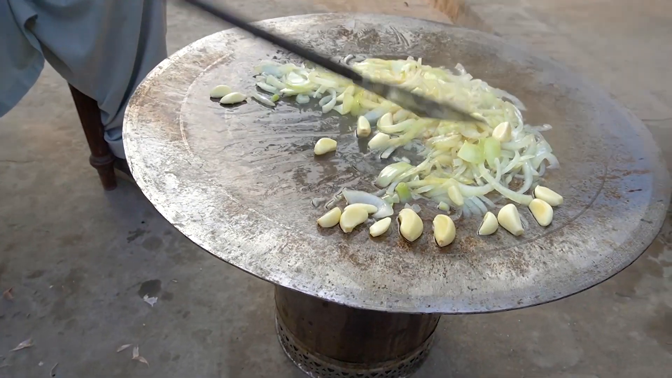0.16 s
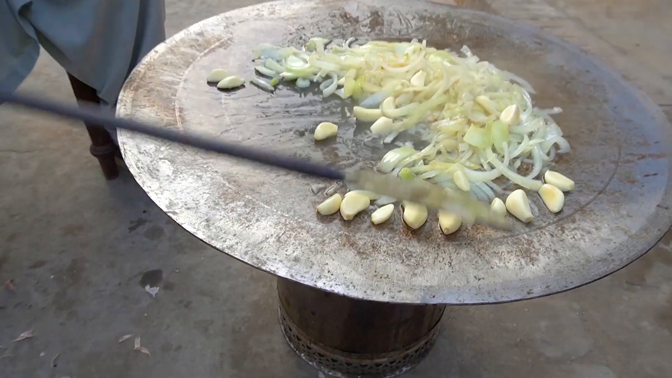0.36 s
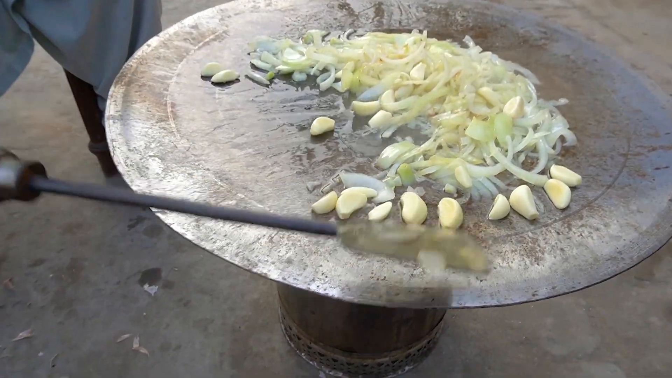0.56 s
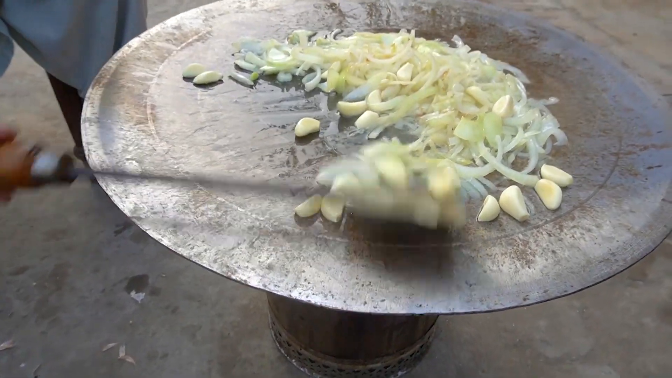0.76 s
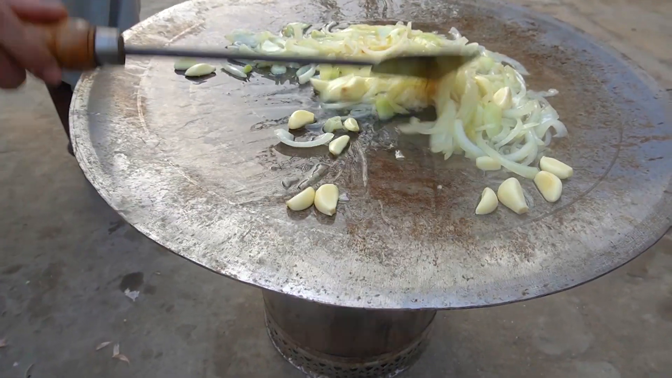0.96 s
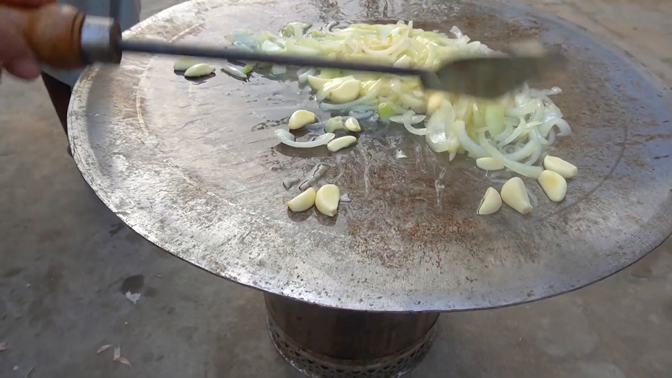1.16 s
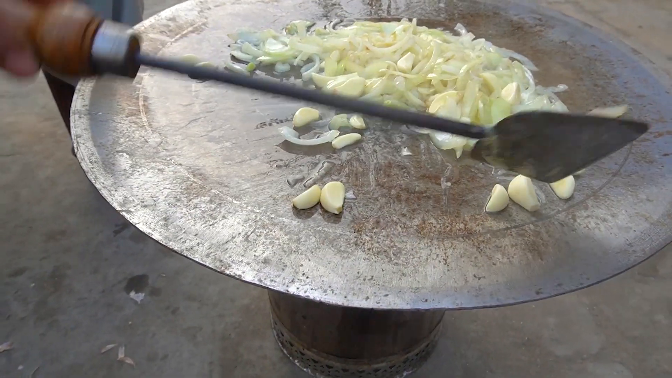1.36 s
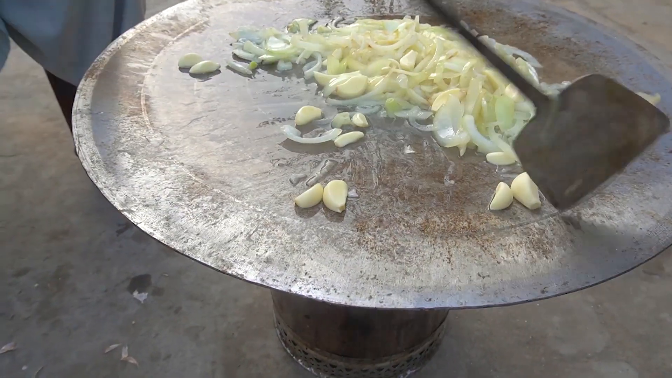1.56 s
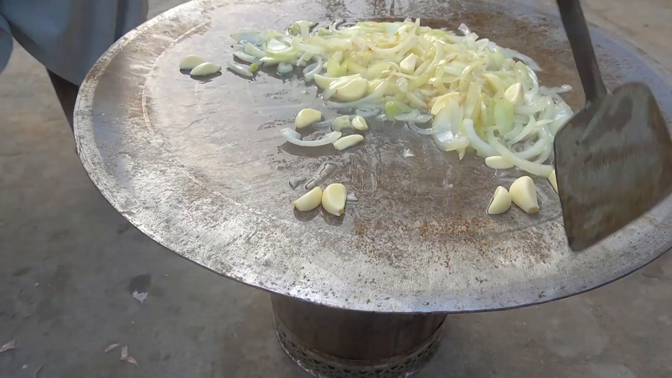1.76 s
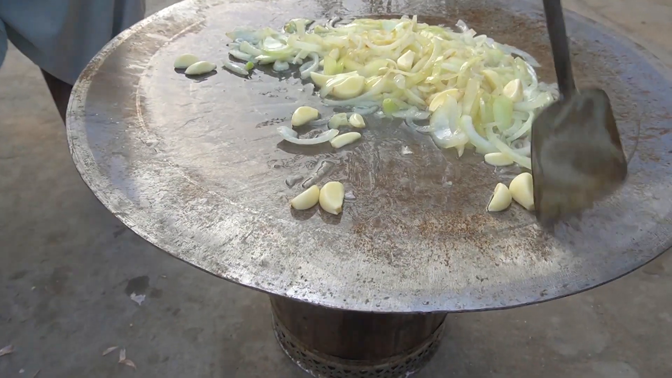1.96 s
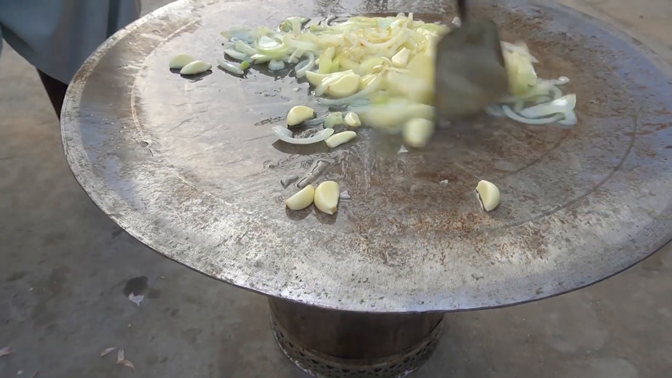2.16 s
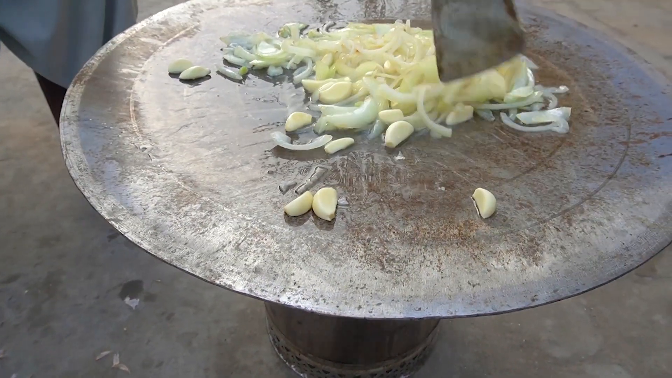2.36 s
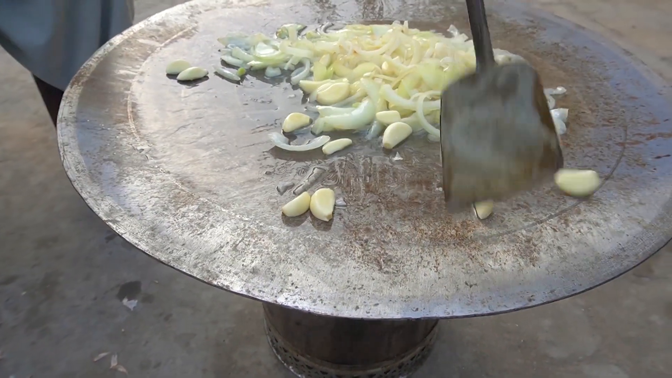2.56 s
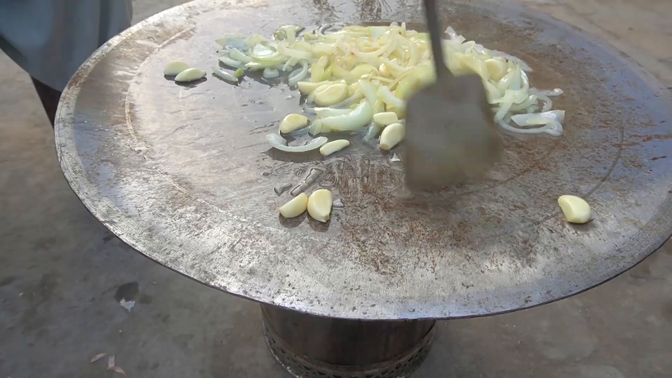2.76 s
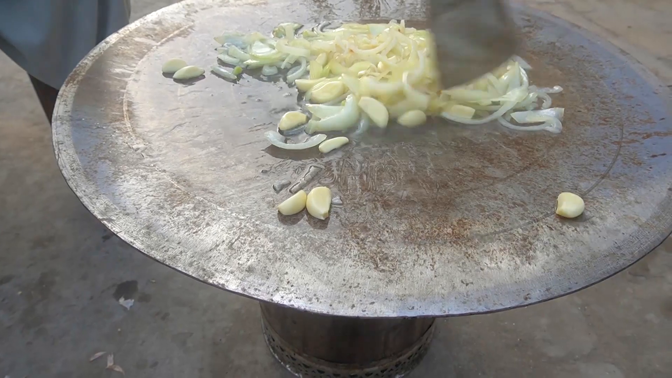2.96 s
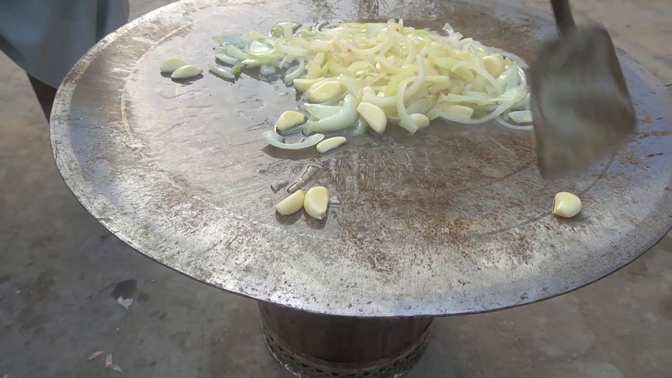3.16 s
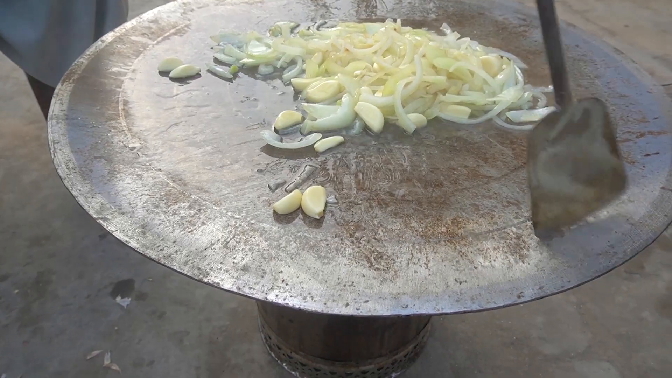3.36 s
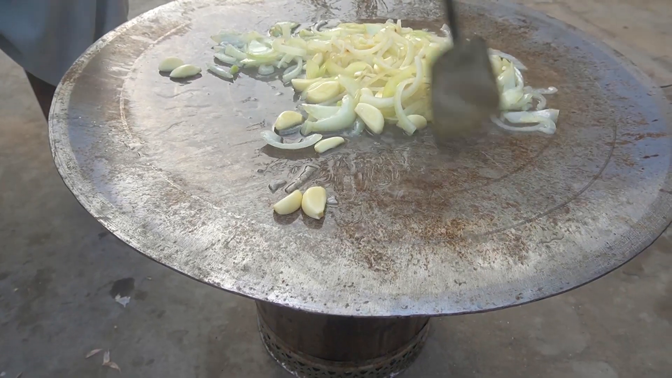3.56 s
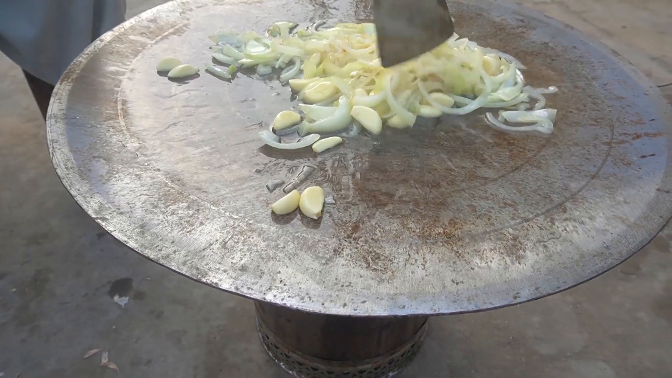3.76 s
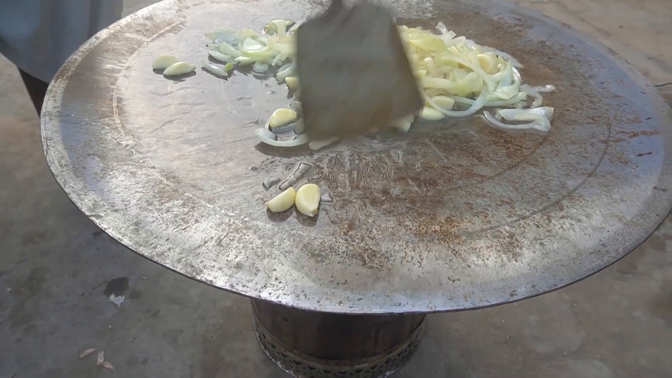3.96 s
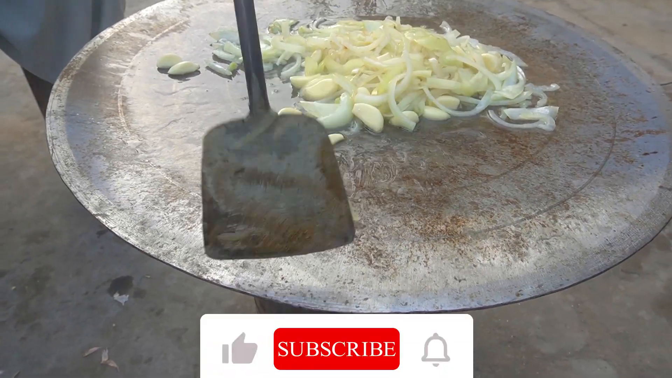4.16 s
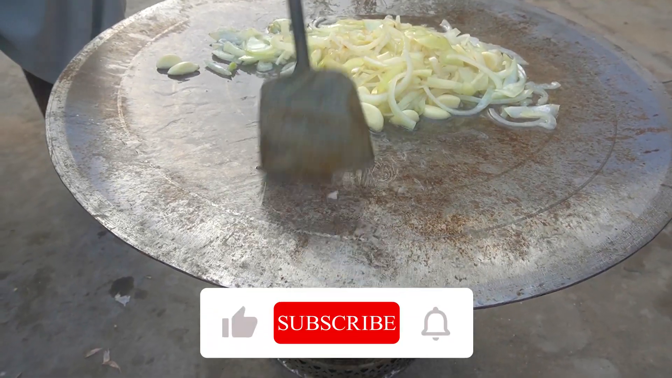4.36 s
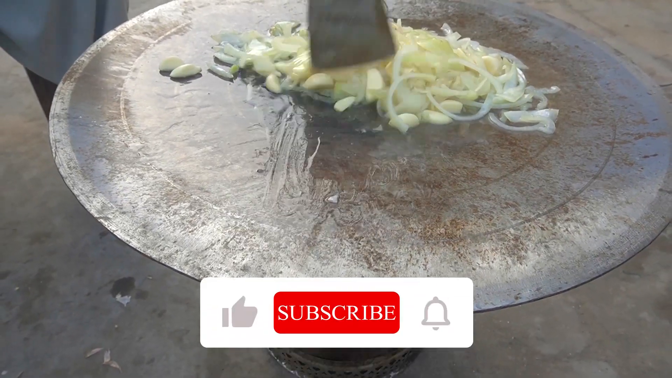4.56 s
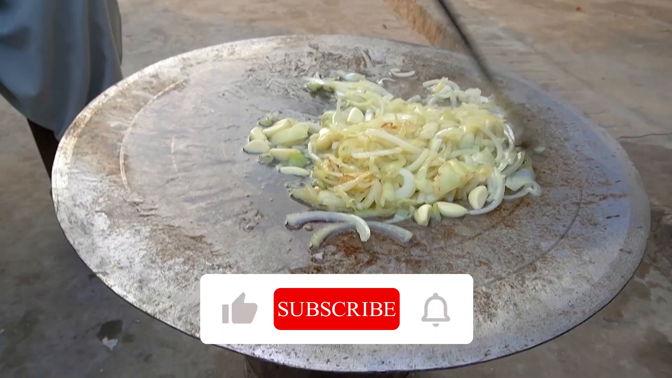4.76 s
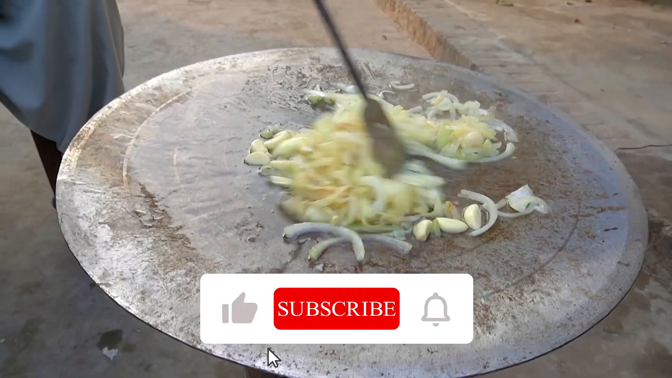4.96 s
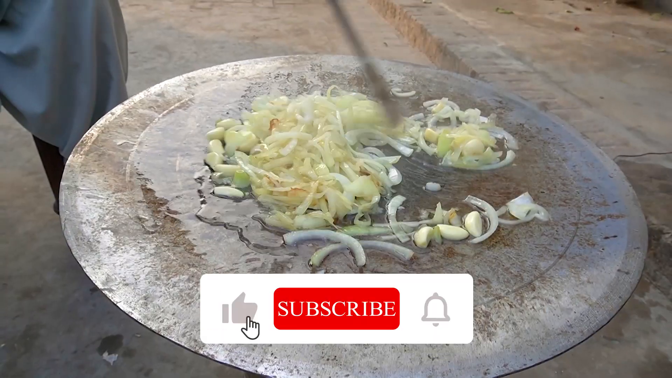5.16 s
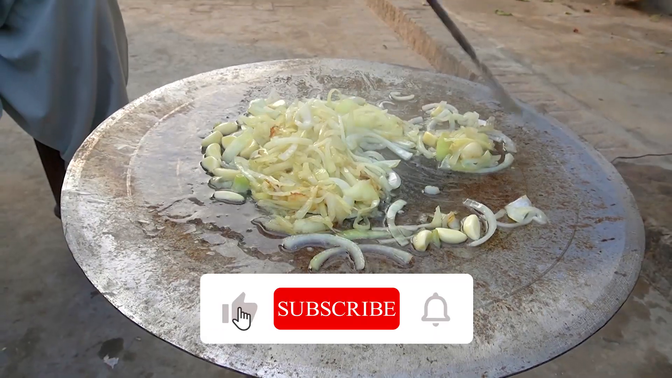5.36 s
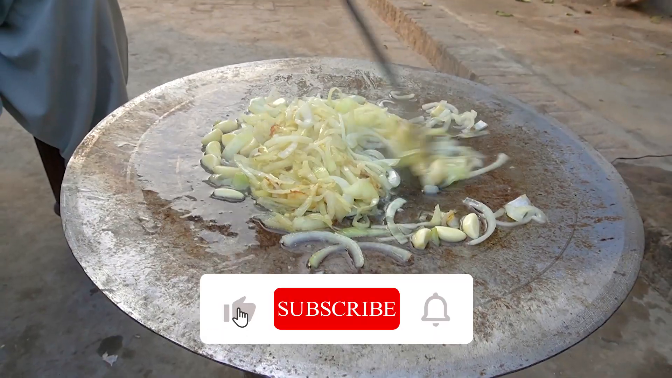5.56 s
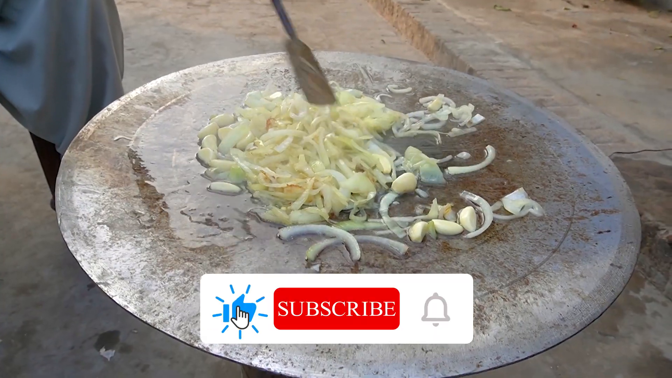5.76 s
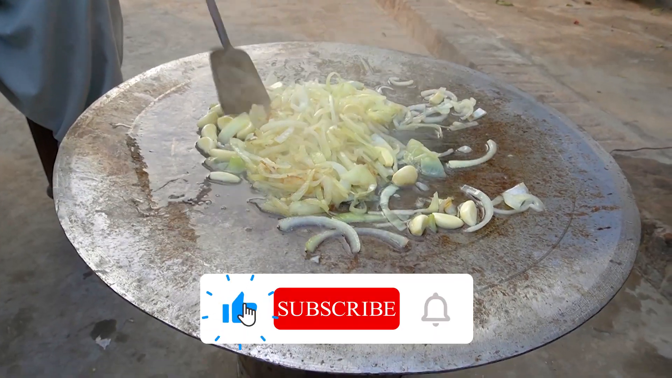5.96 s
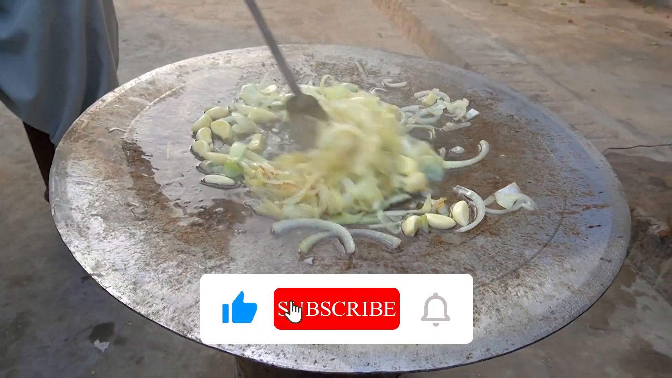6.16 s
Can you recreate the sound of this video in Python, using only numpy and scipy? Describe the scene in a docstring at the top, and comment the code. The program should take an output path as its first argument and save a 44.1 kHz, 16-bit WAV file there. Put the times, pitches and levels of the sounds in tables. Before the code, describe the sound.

Close, gritty steel-on-steel scrapes with bright clanks and short rings, over steady frying hiss and crackle that grows louder near the end.

```python
"""A steel spatula works a wide griddle outdoors, close to a pair of microphones: noisy slips excite blade and plate.
It lands with a clink, grates and lifts, again and again; decaying modes make the blade ring briefly and
the griddle hum on after the blows. Friction squeals and soft onion squelches are swells of resonant noise.
Oil spits in between in short bursts; frying onions hiss and crackle from filtered noise and many small bursts.
Farthest off are the dull rush of fire and open air, and short echoes of the near sounds from the yard."""
import sys
import numpy as np
from scipy import signal
from scipy.fft import rfft, irfft
from scipy.io import wavfile
from scipy.ndimage import uniform_filter1d

SR = 44100
rng = np.random.default_rng(int(sys.argv[2]) if len(sys.argv) > 2 else 0)


def wav_record(signal):
    """Record a signal, one row per channel, as 16-bit PCM in the file named by sys.argv[1]."""
    frames = np.transpose(np.atleast_2d(signal))
    bounded = np.clip(frames, -1, 1)
    # unit amplitude maps onto the largest positive 16-bit level
    quanta = np.round(bounded * 32767).astype(np.int16)
    wavfile.write(sys.argv[1], SR, quanta)


N = 273420
TIME, HZ = np.arange(N) / SR, np.fft.rfftfreq(N, 1 / SR)

# pushes of the spatula, blade flat or on its side edge: (time [s], length [s], rise [s], grating level [dB],
# then relative to the grating: plate rumble [dB], blade rasp [dB], fine grit [dB], first bite [dB],
# ring on lifting [dB]; left over right [dB])
FLAT_PUSHES = [ (.752, 0.16, 0.045, -17.5, -19.5, -13, -1, -35, -34, 1.2),
               (2.05, 0.1, 0.032, -19, -8.5, -7, -1, -10, -22, .7),
               (2.800, 0.014, 0.0025, -15.5, -23.5, -6.5, 0.5, -8, -15.5, 1.3),
               (3.447, 0.17, 0.038, -18, -7.5, -6.5, -3.5, -6, -25.5, .6),
               (4.352, 0.13, 0.01, -20, -22, -7.5, -0.5, -4, -8.5, 3.3), ]
EDGE_PUSHES = [ (4.814, 0.12, 0.056, -17.5, -12.5, -7.5, -4.5, -16, -22, 0.8),
               (5.499, 0.0094, .002, -30, 4.5, -3, 3, -30, -30, 1),
               (5.563, 0.093, 0.029, -16.5, -7, -9, -3, -23, -43, 1.9),
               (6.098, 0.081, 0.0084, -19, -3.5, -2.5, -3, -23, -25, 3.9), ]
# resonances of spatula and plate in contact, blade flat or on its side edge:
# (frequency [Hz], half-width [Hz], relative level [dB])
FLAT_BLADE_MODES = [(1830, 18, -15), (2650, 69, 0.5), (3297, 89, -10), (5050, 190, -3), (5730, 89, -4),
                    (5760, 14, -3), (6510, 17, 8.5), (7000, 35, -24), (7650, 47, -5.5), (7250, 100, 3),
                    (8700, 59, -6.5), (8160, 38, -8), (8450, 17, -16), (8800, 7, 1), (9010, 51, 0),
                    (9800, 47, -16), (9340, 170, -6.5), (10170, 105, -3.5), (10850, 53, -5.5),
                    (11220, 110, -11.5), (12000, 130, -7), (12800, 26, -25), (14300, 66, -22),
                    (15000, 120, -37.5)]
EDGE_BLADE_MODES = [(1673, 60, -1), (2234, 220, 2), (3350, 65, -4), (4140, 330, 5), (4890, 310, 0),
                    (5820, 160, 0), (6940, 120, 0), (7500, 190, -6), (8400, 170, -22), (9000, 230, -3),
                    (9600, 130, -4.5), (10520, 89, -4.5), (11500, 320, -11), (12700, 200, -16),
                    (14100, 140, -19)]
# the plate's resonances under the blade: (frequency [Hz], half-width [Hz], relative level [dB])
PRESSED_PLATE_MODES = [(183, 12, -29), (350, 25, -6), (420, 27, -0.5), (688, 42, 1), (849, 43, 6.5),
                       (1065, 130, 0.5)]
# overall colour of steel grating on steel: (frequency [Hz], relative level per Hz [dB])
GRATING_COLOUR = [(59, -71), (100, -59), (283, -44), (365, -50), (547, -29), (854, 1), (1100, -0.5),
                  (1420, -15.5), (1680, 4.5), (2990, 2.5), (3320, 1.5), (6700, 5.5), (10700, -6.5),
                  (14400, -8.5), (16000, -27)]
# the blade's antiresonance: (frequency [Hz], width [Hz], depth [dB])
ANTIRESONANCE = (1397, 57, 19)
# the spatula strikes the griddle: (time [s], clatter level [dB], relative to the clatter: crack [dB], treble [dB];
# plate thud level [dB], blade ring level [dB], t60 of the clatter [s])
STRIKES = [(0.6845, -35, -3, 17, -36, -36, 0.33), (1.5659, -21, 0, -2, -42, -29.5, 0.2),
           (1.9823, -22, 8, -18, -29, -42, 0.54), (2.4905, -45.5, 3, -28, -42, -70, .05),
           (2.7324, -24.5, 8.5, 2, -28.5, -35.5, 0.27), (2.8594, -20.5, 2, 5, -60, -31, 0.1),
           (3.3903, -23.5, 3.5, 4.5, -29.5, -33, .22), (4.2899, -20.5, 2.5, -1.5, -31.5, -28, 0.19),
           (5.5007, -31, -8, 6.5, -28, -32, 0.12)]
# colour of crack and clatter: (frequency [Hz], relative level per Hz [dB])
CLINK_COLOUR = [(88, -36), (150, -52), (341, -14), (555, -4), (649, -15.5), (1040, 6.5), (1390, -47),
                (1690, -8), (2020, -2), (2700, 0.5), (2920, -8), (4160, 3), (7320, 3), (9080, 4),
                (16000, -19.5)]
# ringing modes of the blade: (frequency [Hz], relative level [dB], t60 before scaling by contact [s])
BLADE_RING_MODES = [(1690, -10, .18), (2330, -11, .18), (3295, -13, .36), (3628, -14, .4), (3980, -16, .3),
                    (4380, -11, .3), (4727, -14, .29), (5130, -7, .3), (5440, -6, .36), (5526, -2, .25),
                    (5820, -7, .27), (5950, -9, .24), (6490, -8, .16), (7400, -10, .16), (8236, -5, .14),
                    (9020, -2, .11), (9320, 1, .091), (9740, 0, .066), (10730, -1, .11), (11240, -12, .15)]
# the griddle's thud under the blade: (frequency [Hz], relative level [dB], t60 [s])
THUD_MODES = [(284, -7, 0.058), (342.2, -6, 0.47), (377.5, 10.5, 0.22), (420.4, -2, 0.28), (723, -2, 0.21),
              (843, 3.5, 0.12), (1082, -4.5, 0.16)]
# friction makes one resonance of blade or plate sing out, sinking in pitch as the contact moves:
# (time [s], length [s], first frequency [Hz], width [Hz], level [dB])
FRICTION_SQUEALS = [(.69, 0.1, 5750, 250, -35.5), (0.77, 0.036, 7100, 120, -23.5),
                    (.828, 0.069, 3400, 396, -23.5), (0.879, 0.061, 1852, 300, -35),
                    (2.085, 0.052, 1770, 160, -24.5), (2.81, 0.026, 6560, 70, -21.5),
                    (2.815, 0.075, 1900, 90, -33), (2.855, 0.028, 6600, 70, -19),
                    (3.485, .1, 950, 250, -36.5), (3.486, .11, 7510, 170, -24),
                    (3.595, .04, 6430, 70, -19.5), (4.383, .13, 1956, 130, -32.5),
                    (4.806, 0.1, 1726, 70, -33.5), (5.608, .063, 4850, 200, -21.5)]
# the whole plate shudders as the blade digs in: (time [s], length [s], level [dB])
PLATE_SHUDDERS = [(.715, 0.047, -58), (2.02, 0.074, -52.5), (2.765, 0.033, -47), (3.42, 0.079, -40.5),
                  (4.30, 0.091, -66), (4.83, 0.15, -52)]
# soft knocks and squelches in the onions: (time [s], length [s], centre [Hz], width [Hz], level [dB])
ONION_SQUELCHES = [(0.307, 0.0062, 2550, 2500, -34), (2.484, 0.029, 915, 600, -38.5),
                   (2.493, 0.047, 398, 147, -43), (3.221, 0.052, 2330, 1111, -43),
                   (5.032, 0.061, 7640, 1800, -39)]
# the griddle is let go and one mode hums on until it is touched again:
# (time [s], length [s], frequency [Hz], level [dB], t60 [s])
GRIDDLE_HUMS = [(1.6, .39, 354, -42.5, 3.6), (2.5, .25, 354, -43, .6), (2.754, .53, 354, -37.5, 1.17),
                (4.42, .4, 734, -49, 2.7), (4.836, 1.3, 263.7, -53, 7), (4.85, .4, 467, -49, 1.2),
                (5.518, .6, 354.5, -30.5, 2.4)]
# the loudest spits of oil: (time [s], level before a common lift [dB], centre [Hz])
LOUD_SPITS = [(0.3063, -19, 7500), (.4098, -14, 12600), (0.553, -21.5, 12500), (.666, -20, 10400),
              (2.5321, -25, 8450), (3.2303, -28.5, 2970), (3.8089, -25, 7240), (5.1639, -20, 8550),
              (5.903, -29, 4050)]
# the sizzle's level wavers, sinks somewhat, then is clearly louder from about 5 s on:
# (time [s], reference level of the frying [dB])
FRYING_LEVEL = [(0, -45.5), (.66, -46), (1, -51.5), (1.9, -47.5), (2.3, -52.5), (3.1, -50), (4.1, -54),
                (4.8, -53), (5.05, -42), (6.2, -44)]
# colour of the steam's hiss: (frequency [Hz], relative level per Hz [dB])
HISS_COLOUR = [(1180, -20), (2000, -17), (2200, -12), (2710, -46), (5580, 3), (8120, 4.5), (11200, 1),
               (12500, 1), (16000, 2)]
# colour of fire and open air: (frequency [Hz], relative level per Hz [dB])
AIR_COLOUR = [(59, -88), (100, -40.5), (252, -10), (315, -19.5), (349, -9.5), (436, -5.5), (545, -4.5),
              (615, -5.5), (808, -2.5), (1260, -4.5), (1500, -3), (1750, -6), (2150, -4.5), (6000, -15),
              (7800, -22), (13200, -120)]
# steady narrow tones in the air: (frequency [Hz], width [Hz], level before a common trim [dB])
AIR_DRONES = [(568, 23, -62.5), (872, 23, -59.5), (1570, 19, -62.5), (2190, 110, -57)]
# likeness of the two microphones: (frequency [Hz], left-right correlation)
MICROPHONE_LIKENESS = [(50, 1), (150, 0.96), (700, 0.93), (1500, 0.79), (3100, 0.72), (7000, 0.53),
                       (15000, 0.43)]

# a push builds from a light touch, holds, and dies as the blade lifts
TOUCH_DB, RELEASE_DB_PER_S = -15, 568
# share of the build-up that the lower bands follow: pressing harder is brighter
RASP_FOLLOWS, RUMBLE_FOLLOWS = 0.57, 0.57
RUMBLE_FADE_DB_PER_S = 94  # the plate's rumble fades as the blade slides in under the onions
BOOM_DB, BOOM_FADE_DB_PER_S = -11, 138  # its lowest modes, relative to the rumble, fade sooner
BITE_CRACK_DB, BITE_TREBLE_DB, BITE_T60, BITE_RING_DB = 3, -28, 0.058, -22  # clink as the edge digs in; t60 in s
LIFT_T60 = 0.27  # s, the blade rings free after a push
REFERENCE_T60 = .2  # s, ring time at which the blade's modes keep their listed t60
SQUEAL_SAG_PER_S = 0.193  # share of the pitch lost each second
SHUDDER_HZ, SHUDDER_WIDTH_HZ = 194.3, 31
HUM_BLOOM_S, HUM_DAMP_S = 0.021, .04  # the hum swells once the blade is off the plate, and dies at the next touch
SMALL_SPITS_PER_S, SMALL_SPIT_HZ = 13, (3000, 10800)
SMALL_SPIT_DB, SMALL_SPIT_SPREAD_DB = 14, 2.2  # over the frying level, before the common lift; and its scatter
AIR_DB, AIR_FOLLOWS = -47.5, 0.53  # air at the mean frying level; share of the frying's swings that it follows
BAND_LIMIT_HZ = 15900


def scrapes(pushes, blade, grain_db, broad_db, plate_db, judder_db, shifting_db):
    """Countless tiny slips excite blade and plate; the pressure builds, judders along the push and lets go."""
    grain = unit(uniform_filter1d(rng.standard_normal(N), 24))
    slips = noise() * amp(grain_db * grain)
    body = np.hypot(peaks(blade), amp(plate_db) * peaks(PRESSED_PLATE_MODES))
    grating = amp(broad_db + read(GRATING_COLOUR, HZ))
    steel = rfft(patchy(colour(slips, hollow() * np.hypot(body, grating)), shifting_db))
    wobble = uniform_filter1d(uniform_filter1d(rng.standard_normal(N), 400), 200)
    judder = amp(judder_db * unit(wobble))

    # boom, rumble, rasp, grating, grit
    edges_hz = [0, 550, 1400, 3200, 7800, SR]
    bands = [judder * irfft(steel * ((HZ >= low) & (HZ < high)), N) for low, high in zip(edges_hz, edges_hz[1:])]

    out = np.zeros((2, N))
    for s, length, rise, level, rumble, rasp, grit, _, _, pan in pushes:
        on = (TIME >= s) & (TIME <= s + length + 40 / RELEASE_DB_PER_S)  # lasts until 40 dB down
        t = TIME[on] - s
        db = level - RELEASE_DB_PER_S * np.maximum(t - length, 0)
        touch = TOUCH_DB * np.maximum(1 - t / rise, 0)
        gains = [
            amp(db + rumble + BOOM_DB - BOOM_FADE_DB_PER_S * t),
            amp(db + rumble + RUMBLE_FOLLOWS * touch - RUMBLE_FADE_DB_PER_S * t),
            amp(db + rasp + RASP_FOLLOWS * touch),
            amp(db + touch) * panned(pan),
            amp(db + grit + touch) * panned(pan),
        ]
        push = sum(gain * unit(band[:, on]) for gain, band in zip(gains, bands))
        out[:, on] += push * signal.windows.tukey(len(t), .02)
    return out


def blows(crack_s=0.0043, thud_rise_s=0.034, sag=0.185, press_s=0.0218):
    """A crack, dense clatter, longer blade modes and the plate's slower thud; each push also bites and rings off."""
    out, t = np.zeros((2, N)), np.arange(SR // 2) / SR
    steel = unit(colour(patchy(noise(), 7.5), hollow() * amp(read(CLINK_COLOUR, HZ))))
    treble = signal.sosfiltfilt(signal.butter(2, 8000, "high", fs=SR, output="sos"), steel)
    stiffening = t - sag * press_s * (1 - np.exp(-t / press_s))  # the thud rises in pitch as the blade bears down

    def clink(s, crack_db, treble_db, t60):
        """A brief crack over a clatter that dies exponentially, both of steel-coloured noise."""
        at = (round(s * SR) + np.arange(len(t))) % N
        fall = amp(crack_db) * np.exp(-(t / crack_s) ** 2) + amp(-60 * t / t60)
        return (steel[:, at] + (amp(treble_db) - 1) * treble[:, at]) * fall

    def blade_ring(t60):
        """The blade's modes ring and die, their decay scaled by the contact."""
        return ring([(hz, level, free * t60 / REFERENCE_T60) for hz, level, free in BLADE_RING_MODES], t)

    for s, db, crack_db, treble_db, thud_db, ring_db, t60 in STRIKES:
        thud = ring(THUD_MODES, stiffening) * (1 - np.exp(-t / thud_rise_s))
        clatter = amp(db) * clink(s, crack_db, treble_db, t60)
        add(out, s, clatter + amp(ring_db) * blade_ring(t60) + amp(thud_db) * thud)

    for s, length, _, db, *_, bite_db, lift_db, _ in FLAT_PUSHES + EDGE_PUSHES:
        bite = clink(s, BITE_CRACK_DB, BITE_TREBLE_DB, BITE_T60) + amp(BITE_RING_DB) * blade_ring(BITE_T60)
        add(out, s, amp(db + bite_db) * bite)
        add(out, s + length, amp(db + lift_db) * blade_ring(LIFT_T60))
    return out


def squeals_and_squelches():
    """Modes caught by friction, shudders of the plate and wet onion being shoved: swells of resonant noise."""
    out = np.zeros((2, N))
    for s, length, hz, width, db in FRICTION_SQUEALS:
        last_hz = hz * (1 - SQUEAL_SAG_PER_S * length)
        add(out, s, amp(db) * swell(length, (hz, last_hz), width))
    for s, length, db in PLATE_SHUDDERS:
        add(out, s, amp(db) * swell(length, SHUDDER_HZ, SHUDDER_WIDTH_HZ))
    for s, length, hz, width, db in ONION_SQUELCHES:
        add(out, s, amp(db) * swell(length, hz, width))
    return out


def griddle_hum():
    """Low plate modes bloom and decay on their own, until a touch damps them."""
    out = np.zeros((2, N))
    for s, length, hz, db, t60 in GRIDDLE_HUMS:
        t = np.arange(int(length * SR)) / SR
        bloom = 1 - np.exp(-t / HUM_BLOOM_S)
        damping = np.minimum((length - t) / HUM_DAMP_S, 1)
        add(out, s, ring([(hz, db, t60)], t) * bloom * damping)
    return out


def spits(cycles=0.92, level_db=2, snap=0.5, snap_s=0.00096):
    """Larger drops of water burst in the oil: a short pulse and a snap of spray. Small ones come at random."""
    out, t = np.zeros((2, N)), np.arange(400) / SR
    times = TIME[rng.random(N) < SMALL_SPITS_PER_S / SR]
    low, high = SMALL_SPIT_HZ
    small = []
    for s in times:
        db = frying_db(s) + rng.normal(SMALL_SPIT_DB, SMALL_SPIT_SPREAD_DB)
        small.append((s, db, low * (high / low) ** rng.random()))
    for s, db, hz in LOUD_SPITS + small:
        spray = np.gradient(rng.standard_normal((2, len(t))) * np.exp(-t / snap_s) * (t > t[1]), axis=1)
        pop = burst(t, hz, cycles) + snap * spray
        add(out, s + 0.001013, amp(db + level_db) * pop * panned(rng.normal(1, 3.1)))
    return out


def frying(hiss_db=-2, crackle_db=-3, bursts_per_s=1300, spread_db=4, air_db=0, tones_db=-1, count=12):
    """Steam hisses and tiny bubbles burst in the oil, over the dull rush of fire and open air."""
    heat_db = frying_db(TIME)
    heat, air = amp(heat_db), amp(AIR_DB + AIR_FOLLOWS * (heat_db - heat_db.mean()))

    # each pitch of bubble has its own random instants, sizes and place between the microphones
    crackle, t = np.zeros((2, N)), np.arange(200) / SR
    for hz in np.geomspace(2400, 15000, count):
        size = amp(spread_db * np.minimum(rng.exponential(1, N), 4.5))
        bubbles = size * (rng.random(N) < bursts_per_s / count / SR)
        pulse = burst(t, hz, 0.5) * (hz / 5000) ** 0.52
        crackle += np.convolve(bubbles, pulse)[:N] * panned(rng.normal(1, 4.2))

    hiss = unit(colour(noise(), amp(read(HISS_COLOUR, HZ))))
    sizzle = heat * (amp(hiss_db) * hiss + amp(crackle_db) * unit(crackle))
    rush = amp(air_db) * unit(colour(noise(), amp(read(AIR_COLOUR, HZ))))
    # the untapered middle of each long swell is steady
    tones = sum(amp(db) * swell(N / SR * 2, hz, width)[:, N // 2:][:, :N] for hz, width, db in AIR_DRONES)
    return sizzle + air * rush + unit(air) * amp(tones_db) * tones


def yard(x, bass_t60=0.26, treble_t60=0.061):
    """Short scattered echoes from the ground and nearby walls; the treble dies sooner."""
    taps = noise()[:, :SR // 2] * (TIME[:SR // 2] > .004)
    hz, t, z = signal.stft(taps, SR, nperseg=256)
    t60 = read([(500, bass_t60), (10000, treble_t60)], hz)[:, None]
    tail = signal.istft(z * amp(-60 * t / t60), SR, nperseg=256)[1]
    return signal.fftconvolve(tail / np.linalg.norm(tail[0]), x, axes=1)[:, :N]


def frying_db(s):
    """Reference level of the frying at time s, in dB."""
    return np.interp(s, *np.transpose(FRYING_LEVEL))


def burst(t, hz, cycles):
    """A bursting bubble: a short oscillation that swells and dies, with no net push."""
    age = t * hz / cycles
    wave = np.gradient(age * np.exp(-age) * np.sin(2 * np.pi * hz * t))
    return wave / abs(wave).max()


def ring(modes, t):
    """Dying modes; high ones reach the two microphones out of step."""
    hz, db, t60 = np.transpose(modes)[:, :, None]
    lag = rng.standard_normal((2, len(modes), 1)) * hz / 12000
    return (amp(db - 60 * t / t60) * np.sin(2 * np.pi * hz * t + lag)).sum(1)


def swell(length, hz, width):
    """A swell of noise in one resonance; hz is one pitch or a glide (first, last)."""
    count = int(length * SR)
    pitch = np.linspace(*np.broadcast_to(hz, 2), count)
    r = np.exp(-np.pi * width / SR)
    complex_noise = rng.standard_normal((count + 4000, 2)) @ [1, 1j]
    wander = signal.lfilter([1], np.poly([r, r]), complex_noise)[-count:]  # the resonance has settled by then
    tone = (wander * np.exp(2j * np.pi * np.cumsum(pitch) / SR)).real
    return unit(tone) * signal.windows.tukey(count, .5) * np.ones((2, 1))


def peaks(rows):
    """Gain of a set of steep-sided resonances."""
    return np.sqrt(sum(amp(db) ** 2 / (1 + ((HZ - hz) / width) ** 2) ** 2 for hz, width, db in rows))


def hollow():
    """Gain of the gap between the plate's low modes and the blade's."""
    hz, width, depth_db = ANTIRESONANCE
    return amp(-depth_db * np.exp(-((HZ - hz) / width) ** 2))


def patchy(x, depth_db, size=14):
    """Modes swell and fade at random as the point of contact travels."""
    z = signal.stft(x, nperseg=512, noverlap=384)[2]
    field = rng.standard_normal(z.shape[1:])
    field = unit(uniform_filter1d(uniform_filter1d(field, size=3, axis=0), size=size, axis=1))
    return signal.istft(z * amp(depth_db * field), nperseg=512, noverlap=384)[1][:, :N]


def colour(x, gain):
    """Causal minimum-phase filter with the given gain on HZ."""
    log_gain = irfft(np.log(np.maximum(gain, gain.max() * 1e-5)), N)
    fold = np.where(np.arange(N) < N // 2, 2., 0)
    fold[0] = 1
    return irfft(rfft(x) * np.exp(rfft(log_gain * fold)), N)


def noise():
    """White noise as the microphone pair hears it."""
    return microphones(rng.standard_normal((2, N)))


def microphones(pair):
    """Two unrelated signals become two microphones, alike in the bass."""
    a, b = rfft(pair)
    angle = np.arccos(np.clip(read(MICROPHONE_LIKENESS, HZ), -1, 1)) / 2
    left = a * np.cos(angle) + b * np.sin(angle)
    right = a * np.cos(angle) - b * np.sin(angle)
    return irfft(np.array([left, right]), N)


def panned(db):
    """Left and right gains for a level difference."""
    return amp(np.array([[.5], [-.5]]) * db)


def add(mix, s, sound):
    """Mixes a stereo sound in at time s."""
    part = mix[:, max(round(s * SR), 0):][:, :sound.shape[1]]
    part += sound[:, :part.shape[1]]


def read(points, hz):
    """Reads a table of values on a log-frequency axis."""
    f, value = np.transpose(points)
    return np.interp(np.log(hz + 1), np.log(f + 1), value)


def unit(x):
    """Scales to rms 1."""
    return x / np.sqrt(np.mean(x ** 2) + 1e-20)


def amp(db):
    """Decibels to gain."""
    return 10 ** (np.asarray(db) / 20)


def limit(x, threshold_db, recovery_db_per_s=120):
    """A limiter holds the loudest moments near one level, then recovers steadily."""
    power_db = 10 * np.log10(abs(uniform_filter1d((x ** 2).mean(0), size=260)) + 1e-12)
    fall = TIME * recovery_db_per_s
    held_db = np.maximum.accumulate(power_db + fall) - fall
    over_db = np.maximum(held_db - threshold_db, 0)
    return x / amp(uniform_filter1d(over_db, size=60))


def scene():
    """Spatula and spitting oil close by with their echoes, then the humming griddle, the frying and the air."""
    flat = scrapes(FLAT_PUSHES, FLAT_BLADE_MODES,
                   grain_db=2.0, broad_db=-11, plate_db=1.0, judder_db=1.75, shifting_db=4.5)
    edge = scrapes(EDGE_PUSHES, EDGE_BLADE_MODES,
                   grain_db=1, broad_db=-10, plate_db=-1, judder_db=0.9, shifting_db=4.5)
    near = flat + edge + blows() + squeals_and_squelches() + spits()
    return near + amp(-12.5) * yard(near) + griddle_hum() + frying()


def record(dry, ceiling=1.0, low_cut_hz=105):
    """The recorder limits, rounds off the sharpest peaks and thins the bass; then the band limit."""
    held = ceiling * np.tanh(limit(dry, threshold_db=-8.5) / ceiling)
    thin = signal.sosfilt(signal.butter(3, low_cut_hz, "high", fs=SR, output="sos"), held)
    band_limit = signal.firwin(511, BAND_LIMIT_HZ, window=("kaiser", 9), fs=SR)
    return signal.oaconvolve(thin, band_limit[None], "same")


dry = scene()
out = record(dry)
wav_record(out)
```